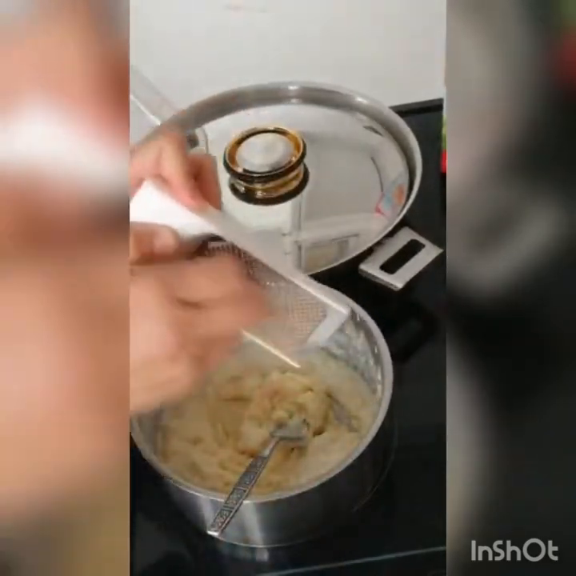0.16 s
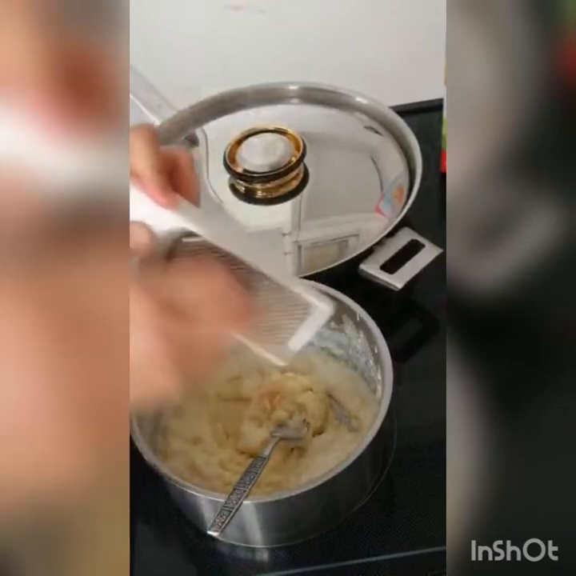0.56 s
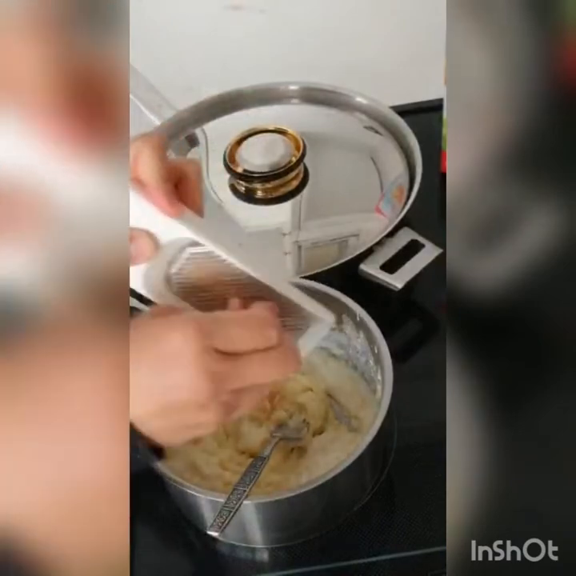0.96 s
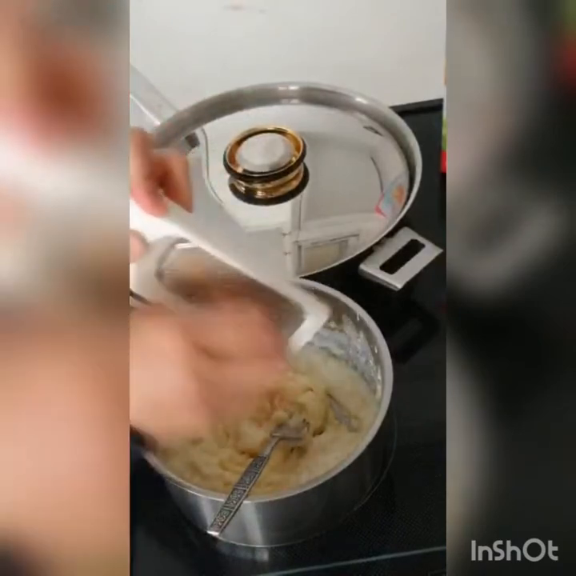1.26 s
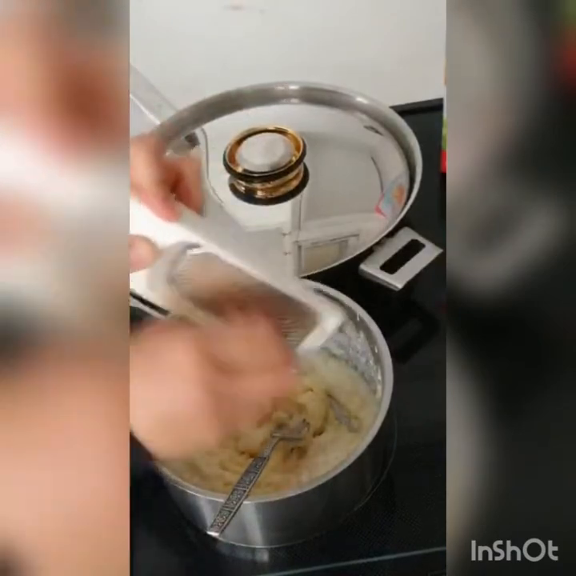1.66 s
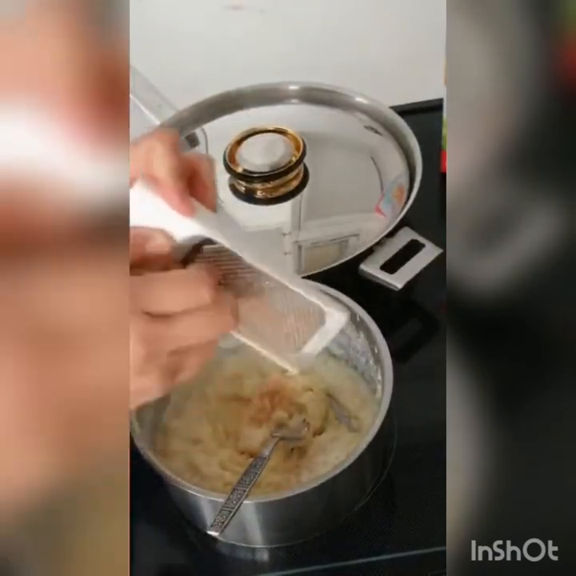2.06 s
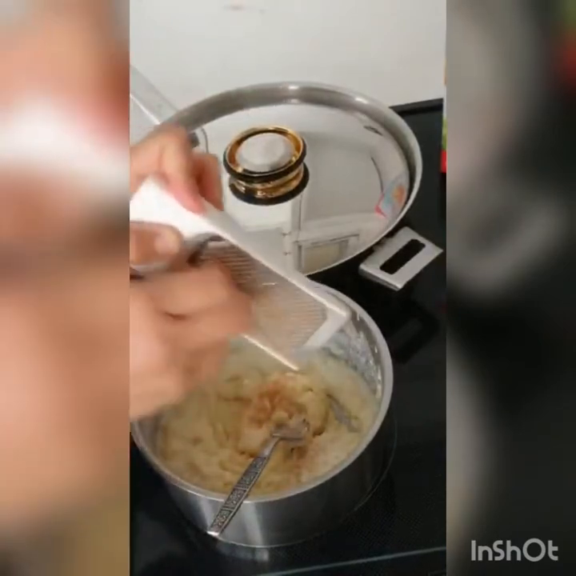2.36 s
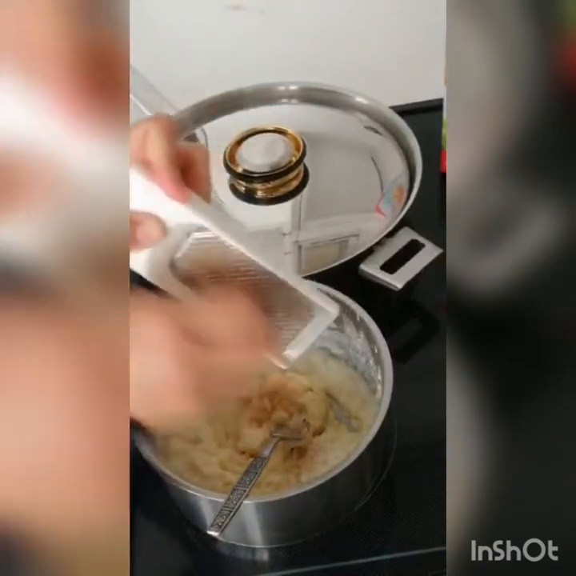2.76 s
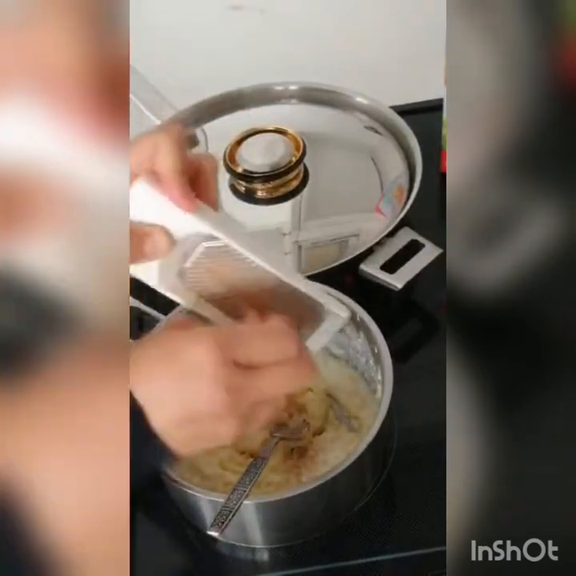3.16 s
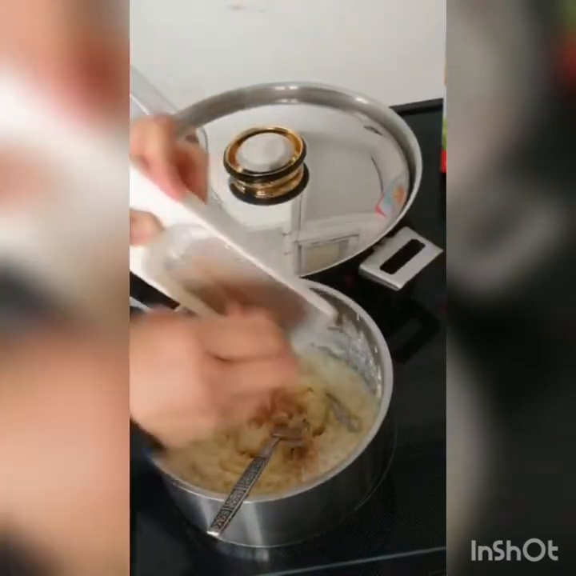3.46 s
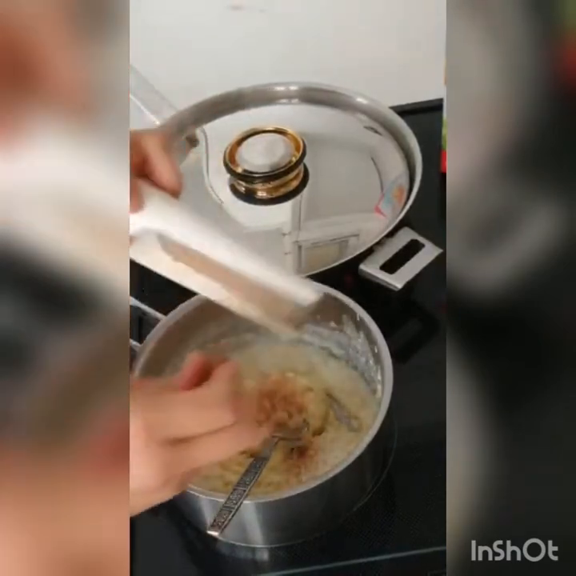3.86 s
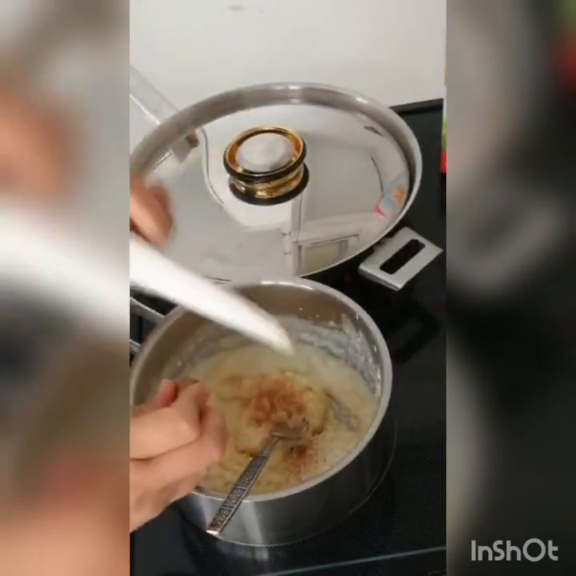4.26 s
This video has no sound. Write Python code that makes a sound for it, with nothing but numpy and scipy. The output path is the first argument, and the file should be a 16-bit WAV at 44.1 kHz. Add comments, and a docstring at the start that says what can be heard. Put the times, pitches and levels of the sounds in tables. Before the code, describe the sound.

Close in a small kitchen, a nutmeg is rubbed quickly and evenly on a fine hand grater, about eight dry, gritty strokes a second, with metallic singing and faint squeaks. The rubbing stops with a little scuff and ping. After a brief pause the grater hits the rim of a steel pot twice, loud and clanging, over a low steady rumble.

```python
"""In a small kitchen, over a low steady rumble, a nutmeg is rubbed on a fine hand grater, about eight strokes a second.
Ticks follow the speed of the hand and random fractures make the rasp; both ring the blade modes,
filtered noise makes the plastic frame thrum, noise bursts are snags and short tones squeak on the pushes.
The nut lifts off with a scuff and a ping of damped modes, then the grater is knocked twice on the rim of a
steel pot: pulses and noise rattle, damped modes and a noisy lid ring. A decaying noise tail is the room."""
import sys
import numpy as np
from scipy import signal
from scipy.fft import rfft, irfft, next_fast_len
from scipy.io import wavfile
from scipy.ndimage import uniform_filter1d, map_coordinates

SR = 44100
rng = np.random.default_rng(int(sys.argv[2]) if len(sys.argv) > 2 else 0)


def inscribe(sig):
    """Save sig as 16-bit PCM at rate SR to the path in sys.argv[1].

    A 1-D sig is mono; a 2-D sig holds one channel per row.
    Samples are clipped to [-1, 1] before scaling.
    """
    pcm = np.round(np.clip(np.atleast_2d(sig).T, -1, 1) * 32767)
    wavfile.write(sys.argv[1], SR, pcm.astype(np.int16))


N = 194062  # length [samples]

# All levels in the tables are relative; the mix sets the final balance.
# Low steady background of the kitchen: (frequency [Hz], density [dB per Hz])
RUMBLE_SPECTRUM = [(20, -10), (45, 5), (140, 1.5), (220, -9.5), (420, -20.5), (1200, -21.5), (2400, -16.5),
                   (3300, -24.5), (8000, -33), (11500, -32), (15500, -42)]
# Decay of the room: (frequency [Hz], t60 [s])
ROOM_DECAY = [(100, 0.75), (700, 0.51), (1800, 0.29), (4800, 0.31), (12800, 0.25)]
# Stereo balance: (frequency [Hz], left minus right [dB])
STEREO_TILT = [(200, 2), (380, -0.5), (700, 0), (1290, -2.5), (2380, 0.5), (4400, 0), (8120, 6.5),
               (11000, -1.5), (14000, -7.5)]
# Likeness of left and right: (frequency [Hz], correlation [0 to 1])
STEREO_LIKENESS = [(60, 1), (160, 1), (300, 0.54), (640, 0.022), (1400, 0.091), (3100, 0.15), (7000, 0.05),
                   (15000, 0.11)]

# Contacts of grater and pot: (time [s], level [dB], weight of the blow [dB])
KNOCKS = [(4.098, -33, -12), (4.102, -0.5, 0), (4.331, -35, -12), (4.356, -31, -25), (4.3741, -3.5, 2),
          (4.3815, -8, 4)]
# Damped modes of pot and hob: (frequency [Hz], level [dB], t60 [s])
POT_MODES = [(43.8, -9, 0.47), (70, -16, 0.31), (108.8, -9.5, 0.42), (179, -2.5, 0.16), (337, 1.5, 0.067),
             (500, 0, 0.04), (645, -3, 0.059), (846, -6, 0.12), (836, -9, 0.08), (1150, -9, 0.64),
             (1166, 9, 0.051), (1410, -10.5, 0.81), (1580, -4, 0.7), (1630, 14.5, 0.031), (1690, -14, 0.57),
             (2000, 1.5, 0.052), (1942, -14.5, 0.88), (2420, -23, 0.27), (2490, -16, 0.06),
             (2640, -20, 0.17), (2970, -23, .08), (3630, 1, 0.059)]
# Dense ring of the lid: (frequency [Hz], density [dB per Hz])
LID_SPECTRUM = [(60, 1.5), (300, -7.5), (800, 1.5), (1500, 5), (2500, 0.5), (3700, -2), (4300, -11),
                (5600, -10), (7000, -15.5), (11500, -17.5), (15500, -39)]
# Plastic rattle of a knock: (frequency [Hz], density [dB per Hz])
CLACK_SPECTRUM = [(30, -1), (150, -13), (260, -18.5), (450, -7.5), (800, -2.5), (1400, -3), (2100, 0.5),
                  (3600, -9), (4200, -13.5), (5700, -15.5), (7000, -24), (11500, -15), (15500, -37)]

# The nut flicks the blade as it leaves: (frequency [Hz], level [dB], t60 [s])
PING_MODES = [(1880, -13, 0.05), (2174, -18, 0.073), (2210, -8, 0.096), (2386, 12, 0.015),
              (2511.4, -6, 0.13), (2570, -8, 0.13), (3700, -22, 0.0905), (6230, -7, 0.019)]
# The last touch of the nut: (frequency [Hz], density [dB per Hz])
SCUFF_SPECTRUM = [(500, -37), (1500, -18), (2000, -2), (2450, -3), (2900, -14), (4500, -27), (6200, -23),
                  (9000, -30), (15500, -36)]

# Strokes, pull and push in turn: (middle time [s], level [dB])
STROKES = [(.027, -28.5), (.148, -29.5), (.271, -28), (.39, -28), (.508, -27.5), (.627, -28), (.752, -27.5),
           (.863, -28.5), (.987, -26), (1.108, -29), (1.231, -28), (1.355, -27), (1.476, -26.5),
           (1.592, -26.5), (1.718, -27.5), (1.835, -27), (1.953, -29), (2.066, -27.5), (2.213, -28),
           (2.334, -28), (2.453, -26), (2.585, -28), (2.702, -26.5), (2.826, -27.5), (2.933, -27.5),
           (3.065, -28.5), (3.179, -28), (3.31, -27), (3.425, -27), (3.563, -28.5), (3.673, -25.5)]
# Teeth passed through a pull, fastest before its end half: (share of stroke [0 to 1], rate [teeth/s])
PULL_SPEED = [(0, 1300), (.26, 2081), (.44, 2150), (.62, 1475), (1, 1100)]
# Teeth passed through a push, slow at first and fastest late: (share of stroke [0 to 1], rate [teeth/s])
PUSH_SPEED = [(0, 977), (0.318, 1270), (.47, 2104), (0.699, 2217), (0.999, 1455)]
# A pull: (steepness of rise [exponent], steepness of fall [exponent], chatter [dB], blade ring [dB])
PULL_SHAPE = (1.74, 2.2, -1.5, -1)
# A push: (steepness of rise [exponent], steepness of fall [exponent], chatter [dB], blade ring [dB])
PUSH_SHAPE = (1.46, 2.23, 0.76, -1.5)
# How deeply the teeth cut: (time [s], level [dB])
BITE_DEPTH = [(0, -2), (.85, -5.5), (1.1, 2.5), (1.4, .5), (1.8, -1), (2, -1), (2.6, 0), (3.2, -1.5),
              (3.7, 0)]
# The nut snags on a tooth: (time [s], level [dB])
SNAGS = [(1.086, -11), (1.791, -14), (1.803, -10), (2.298, -16.5), (2.547, -16.5), (3.033, -11.5)]
# Resonances of the blade: (centre [Hz], width [Hz], level [dB])
BLADE_MODES = [(1160, 72, -3.5), (2017, 40, 4), (2320, 14, -8), (2493, 5.2, 7), (2770, 16.7, -7),
               (3310, 113, 9.5), (3746, 54, 6), (4340, 24.7, -38.5)]
# Rasp of breaking crumbs: (frequency [Hz], density [dB per Hz])
CRUMB_SPECTRUM = [(100, -45), (300, -32.5), (600, -29), (1000, -20), (1600, -6), (2400, 0.5), (3000, -1.5),
                  (3800, -2.5), (5500, -5.5), (8300, -13), (10000, -10), (11800, -5.5), (13500, -16),
                  (15500, -24.5)]
# Chatter of the teeth: (frequency [Hz], density [dB per Hz])
CHATTER_SPECTRUM = [(200, -55), (650, -23), (900, -5), (1200, -1), (1550, -7.5), (2100, 3.5), (3000, -10.5),
                    (5000, -24.5), (12000, -33)]
# Thrum of the plastic frame: (frequency [Hz], density [dB per Hz])
FRAME_SPECTRUM = [(20, -33), (45, 6.5), (90, -11), (140, 2.5), (165, 1), (185, 2.5), (225, -20.5),
                  (280, -27), (340, -12), (480, -39.5), (1500, -33)]

TOP_HZ = 15600  # band limit of the microphone
LIFT_S = 3.851
TOUCH_S = 4.33  # the grater brushes the rim again and stills the pot
STROKE_S = 0.12  # sets the outer ends of the first and last stroke
SPEED_SCATTER = 0.04  # spread of log speed between strokes, and of log squeak pitch
BITE_SCATTER_DB = 3.45  # the nut meets the blade at a new angle on every stroke
SQUEAK_HZ, SQUEAK_DB, SQUEAK_LATE_S = 2170, -32, 0.0049  # centre pitch, base level, delay after mid-push


def amp(db):
    """Decibels to gain."""
    return 10 ** (np.asarray(db) / 20)


def unit(x):
    """Scale a signal to rms 1."""
    return x / np.sqrt(np.mean(x ** 2) + 1e-20)


def along(points, hz):
    """Read a (frequency, value) curve on a log frequency axis."""
    f, v = np.transpose(points)
    return np.interp(np.log(hz + 1), np.log(f + 1), v)


def wobble(rate):
    """A smooth random curve, rate knots a second."""
    knots = rng.standard_normal(int(N * rate / SR) + 4)
    return map_coordinates(knots, [np.arange(N) * rate / SR])


def filtered(x, response):
    """Multiply the spectrum by a complex response of frequency."""
    size = x.shape[-1]
    padded = 2 * next_fast_len((size + SR // 2) // 2)
    spectrum = rfft(x, padded) * response(np.fft.rfftfreq(padded, 1 / SR))
    return irfft(spectrum, padded)[..., :size]


def coloured(x, spectrum):
    """Shape a sound with a causal, minimum-phase filter of the given spectrum."""
    def response(hz):
        # folding the cepstrum forward in time makes the filter causal
        cepstrum = irfft(np.log(amp(along(spectrum, hz))))
        cepstrum[1:len(hz) - 1] *= 2
        cepstrum[len(hz):] = 0
        return np.exp(rfft(cepstrum))
    return filtered(x, response)


def paired(pair):
    """Blend two unrelated signals into left and right, alike in the bass and apart in the treble."""
    def mid_side(hz):
        turn = np.arccos(np.clip(along(STEREO_LIKENESS, hz), -1, 1)) / 2
        return np.array([np.cos(turn), np.sin(turn)])
    mid, side = filtered(pair, mid_side)
    return np.array([mid + side, mid - side])


def ring(modes, t, scatter_db):
    """Damped modes with scattered strengths; real and imaginary parts lie a quarter cycle apart."""
    total = 0
    for hz, db, t60 in modes:
        decay = amp(db + scatter_db * rng.normal() - 60 * t / t60)
        total = total + decay * rng.choice([-1, 1]) * np.exp(2j * np.pi * hz * t)
    return total


def add(track, s, sound):
    """Mix a sound into a track at time s."""
    part = track[..., round(s * SR):][..., :sound.shape[-1]]
    part += sound[..., :part.shape[-1]]


def rumble():
    """Steady noise, heaviest in the bass, fills the background."""
    return amp(-57) * unit(coloured(paired(rng.standard_normal((2, N))), RUMBLE_SPECTRUM))


def kitchen(x):
    """The hard walls answer with a diffuse tail whose treble dies first."""
    noise = rng.standard_normal((2, SR // 2 + 4096))
    hz, t, z = signal.stft(noise, SR, nperseg=256)
    decay = amp(-60 * t / along(ROOM_DECAY, hz)[:, None])
    tail = signal.istft(z * decay, SR, nperseg=256)[1]
    tail = paired(tail / np.linalg.norm(tail[0]))
    delayed = np.pad(tail, ((0, 0), (round(.006 * SR), 0)))
    return signal.fftconvolve(x, delayed, axes=1)[:, :N]


def knocks():
    """Each contact is a sharp push with a plastic rattle; its weight sets pot and lid ringing."""
    t = np.arange(SR) / SR
    clacks, pot, lid = np.zeros((3, 2, N))
    for s, db, weight_db in KNOCKS:
        # a fast and a slower decay together
        fade = amp(-5.5 - 60 * t / 0.013) + amp(-0.5 - 60 * t / 0.079)
        rattle = fade * paired(rng.standard_normal((2, len(t))))
        rattle[:, 0] -= amp(1)  # the push, one sample long
        add(clacks, s, amp(db) * rattle)

        modes = ring(POT_MODES, t, scatter_db=2.0) * (1 - np.exp(-t / 0.001))
        if s < TOUCH_S:
            modes = modes * amp(-60 * np.maximum(s + t - TOUCH_S, 0) / 0.063)
        add(pot, s, amp(db + weight_db - 20.5) * paired(np.array([modes.imag, modes.real])))

        # the thin lid has too many modes to tell apart
        lid_fade = amp(db + weight_db - 16.0 - 60 * t / 0.56)
        add(lid, s, lid_fade * paired(rng.standard_normal((2, len(t)))))
    return coloured(clacks, CLACK_SPECTRUM) + pot + coloured(lid, LID_SPECTRUM)


def lift():
    """The nut leaves the blade with a short noise scuff and a small soft ping of damped modes."""
    out, t = np.zeros((2, N)), np.arange(SR // 4) / SR
    ping = ring(PING_MODES, t, scatter_db=2.0) * (1 - np.exp(-t / 0.00042))
    scuff = coloured(amp(-60 * t / 0.041) * rng.standard_normal((2, len(t))), SCUFF_SPECTRUM)
    ping_pair = np.array([ping.imag, ping.real])
    add(out, LIFT_S, paired(amp(-38.5) * ping_pair + amp(-23.5) * scuff))
    return out


def bite_db(s):
    """Depth of the cut at time s, as a level."""
    return np.interp(s, *np.transpose(BITE_DEPTH))


def squeaks(length=0.0053, rough=0.02627, scatter_db=2):
    """Stick and slip: a short, rough tone swells and fades just after the middle of each push."""
    t = np.arange(N) / SR
    s = np.transpose(STROKES)[0][1::2] + SQUEAK_LATE_S
    louder, higher = rng.standard_normal((len(s), 2)).T
    db = SQUEAK_DB + bite_db(s) + scatter_db * louder
    swell = sum(amp(level) * np.exp(-((t - at) / length) ** 2 / 2) for at, level in zip(s, db))
    drift = SPEED_SCATTER * np.interp(t, s, higher)
    pitch = SQUEAK_HZ * np.exp(drift + rough * wobble(300))
    return swell * amp(1.0 + 0.92 * wobble(290)) * np.sin(2 * np.pi * np.cumsum(pitch) / SR)


def hand():
    """Strokes swell and fade between turns of the hand: force, teeth a second, chatter and ring gain."""
    t = np.arange(N) / SR
    force, chatter_db, ring_db = np.zeros((3, N))
    tooth_hz = np.full(N, 900.)
    middles = np.transpose(STROKES)[0]
    between = (middles[:-1] + middles[1:]) / 2
    turns = np.r_[middles[0] - STROKE_S / 2, between, middles[-1] + STROKE_S / 2]
    for k, (middle, db) in enumerate(STROKES):
        shape, speed = (PUSH_SHAPE, PUSH_SPEED) if k % 2 else (PULL_SHAPE, PULL_SPEED)
        rise, fall, chatter, sing = shape
        on = (t > turns[k]) & (t < turns[k + 1])
        swing = np.interp(t[on], [turns[k], middle, turns[k + 1]], [0, 1 / 2, 1])
        steepness = np.where(swing < 1 / 2, rise, fall)
        force[on] = amp(db) * np.abs(np.sin(np.pi * swing)) ** steepness
        tooth_hz[on] = np.interp(swing, *np.transpose(speed)) * np.exp(SPEED_SCATTER * rng.normal())
        started = t > turns[k]
        chatter_db[started] = chatter + BITE_SCATTER_DB * rng.normal()
        ring_db[started] = sing + BITE_SCATTER_DB * rng.normal()
    smooth_ring_db = uniform_filter1d(ring_db, size=SR // 50)
    return force, tooth_hz, amp(chatter_db + bite_db(t)), amp(smooth_ring_db + bite_db(t))


def teeth(tooth_hz, jitter, size_db, judder):
    """One uneven tick for each tooth that the nut crosses; the nut judders as it goes."""
    passed = np.cumsum(tooth_hz * np.exp(judder * wobble(260))) / SR
    index = np.arange(int(passed[-1]))
    at = np.interp(index + jitter * rng.standard_normal(len(index)), passed, np.arange(N))
    sizes = amp(size_db * np.minimum(rng.standard_normal(len(index)), 2))
    return np.bincount(np.round(at).astype(int), sizes, N)


def crumbs(rate, size_db):
    """Tiny fractures at random moments, with a separate random polarity in each ear."""
    sizes = amp(size_db * np.minimum(rng.standard_normal(N), 2))
    return (rng.random(N) < rate / SR) * sizes * rng.choice([-1, 1], (2, N))


def snagging():
    """A tooth catches the nut: each snag is a short decaying burst of noise."""
    t = np.arange(SR // 50) / SR
    snags = np.zeros((2, N))
    for s, db in SNAGS:
        add(snags, s, amp(db - 7.5 - 60 * t / 0.023) * paired(rng.standard_normal((2, len(t)))))
    return snags


def blade_response(hz):
    """Parallel resonances of the blade, alternating in sign."""
    total = 0
    for k, (centre, width, db) in enumerate(BLADE_MODES):
        damping = 1j * hz * width
        total = total + (-1) ** k * amp(db) * damping / (centre * centre - hz * hz + damping)
    return total


def grating():
    """Crumbs, teeth and snags excite the blade; the rubbing force also shakes the frame."""
    force, tooth_hz, chatter_gain, ring_gain = hand()
    grip = force * amp(1.34 * wobble(150))
    bites = teeth(tooth_hz, jitter=.12, size_db=2.5, judder=.12)

    # fractures are strongest just after a tooth has bitten
    after_bite = signal.lfilter([1], [1, -np.exp(-1 / (SR * 0.0002))], bites)
    fracture = unit(1.66 + unit(after_bite))
    cracks = grip * fracture * unit(paired(crumbs(rate=16000, size_db=2.0)))
    # slow teeth bite deeper
    ticks = grip * (2000 / tooth_hz) ** 0.24 * unit(coloured(bites, CHATTER_SPECTRUM))
    snags = snagging()

    rasp = amp(6.5) * coloured(cracks, CRUMB_SPECTRUM)
    chatter = amp(-13) * chatter_gain * ticks + amp(5.5) * coloured(snags, CHATTER_SPECTRUM)
    # the blade sings out when the tooth rate meets one of its modes
    blade = ring_gain * filtered(cracks + 0.32 * ticks + snags, blade_response)
    thrum = unit(coloured(rng.standard_normal(N), FRAME_SPECTRUM))
    frame = amp(-27.5) * force * chatter_gain * thrum
    jolts = amp(-2.5) * coloured(snags, FRAME_SPECTRUM)
    return rasp + chatter + blade + frame + jolts


def scene():
    """Grating, ping and knocks in the room, over its low steady rumble."""
    rub, ping, blows = grating() + squeaks(), lift(), knocks()
    room = kitchen(amp(-6.0) * rub + amp(-4.5) * ping + amp(-14.5) * blows)
    # the grater is held a little to the right
    sound = (rub + ping) * amp([[-1.05], [1.05]]) + blows + room

    def tilt(hz):
        half_db = along(STEREO_TILT, hz) / 2
        return amp(np.array([half_db, -half_db]))
    return filtered(sound, tilt) + rumble()


def record(dry):
    """The microphone rounds off the highest peaks and cuts steeply above its band limit."""
    held = dry / (1 + np.abs(dry) ** 6) ** (1 / 6)
    return filtered(held, lambda hz: 1 / np.sqrt(1 + (hz / TOP_HZ) ** 160))


dry = scene()
out = record(dry)
inscribe(out)
```